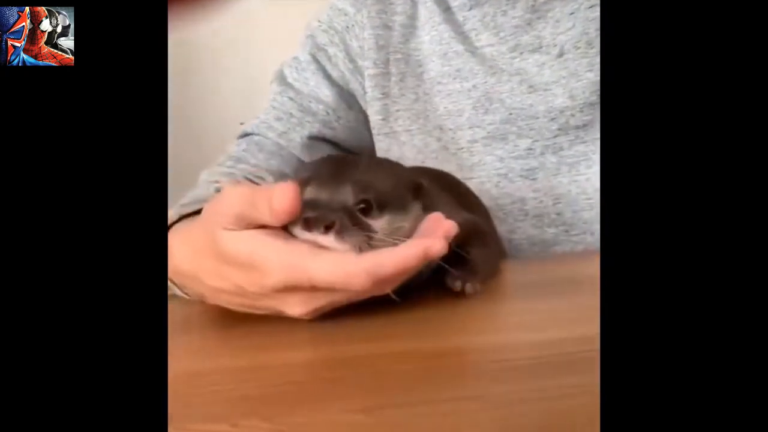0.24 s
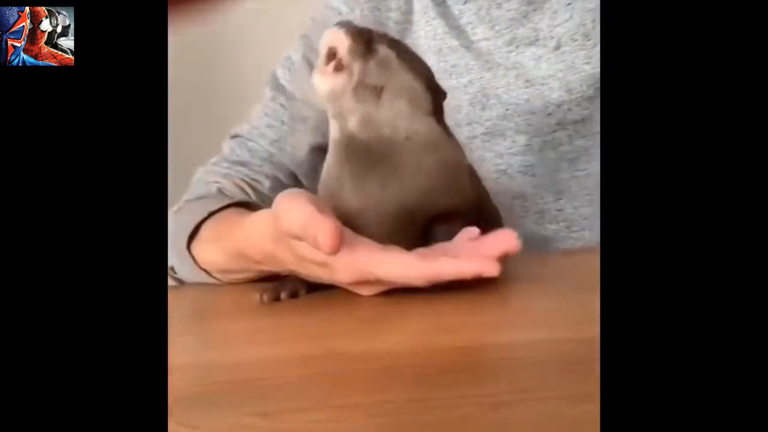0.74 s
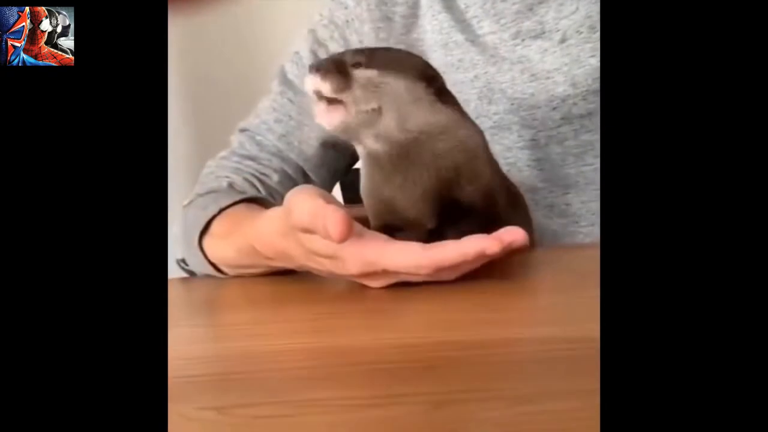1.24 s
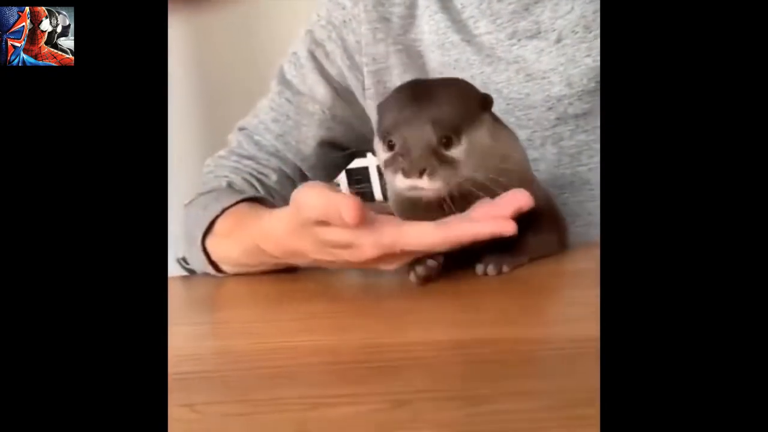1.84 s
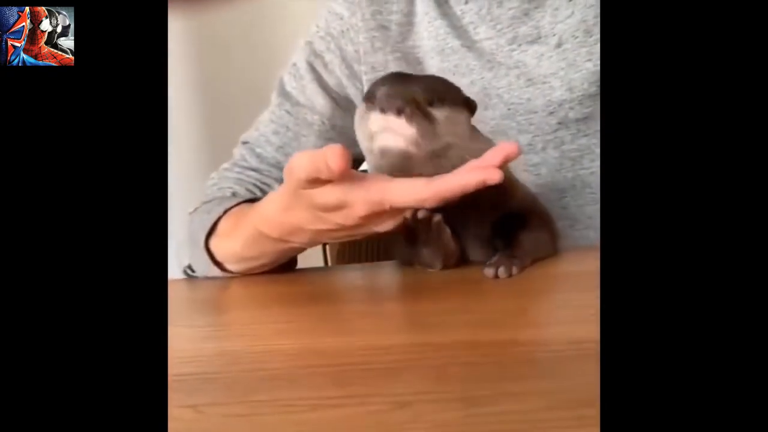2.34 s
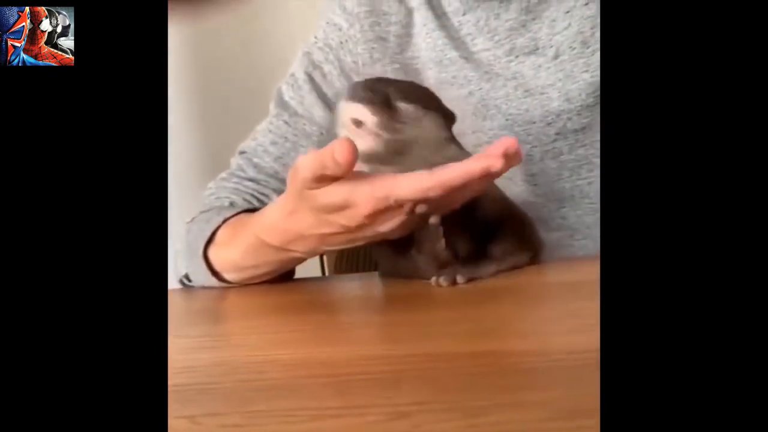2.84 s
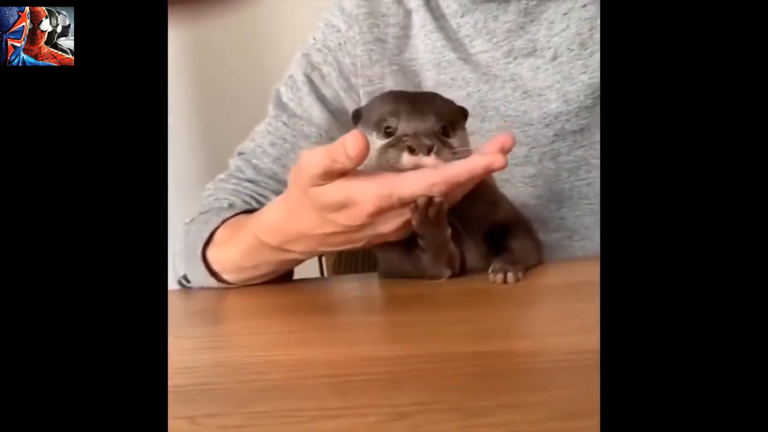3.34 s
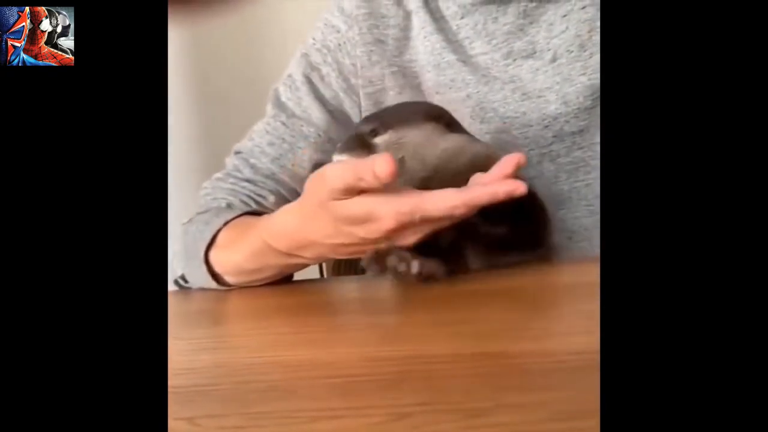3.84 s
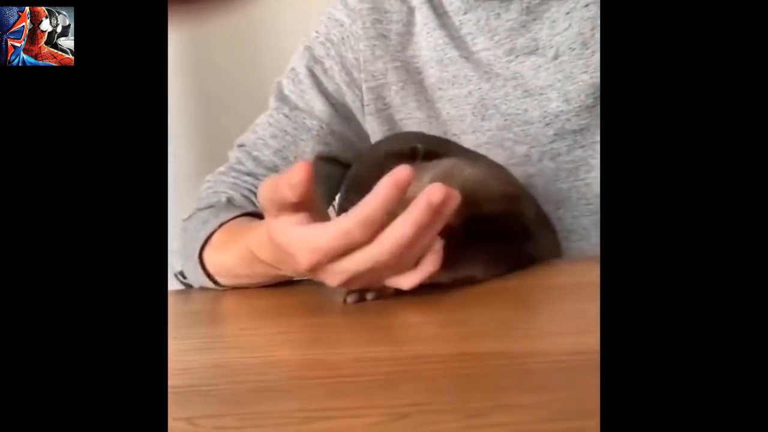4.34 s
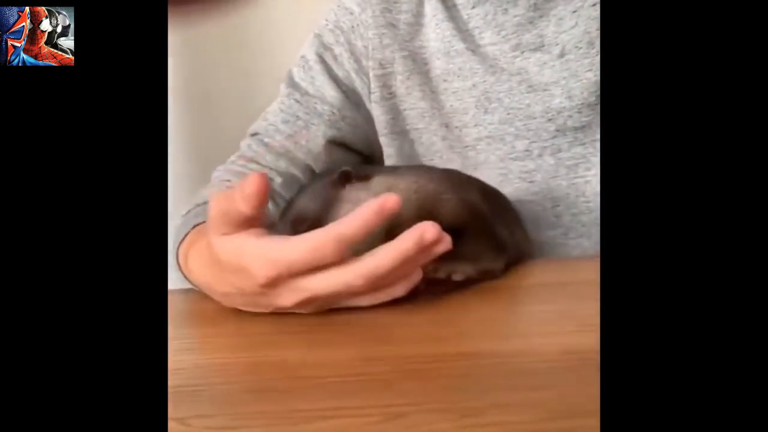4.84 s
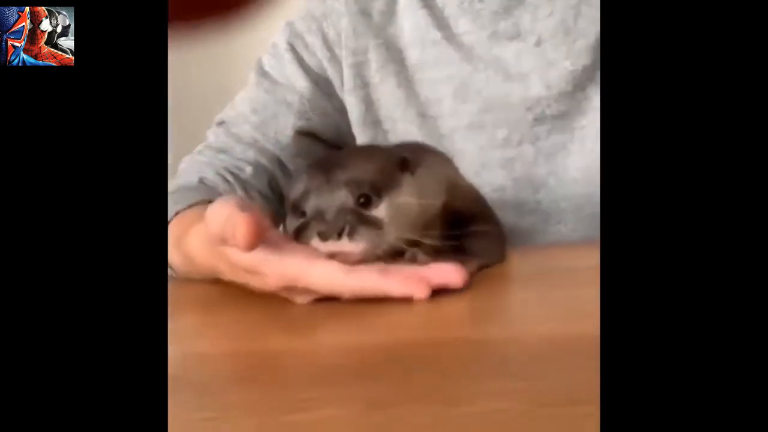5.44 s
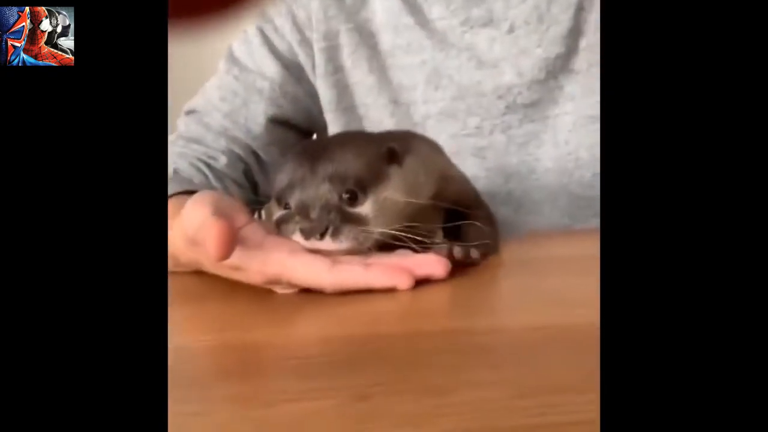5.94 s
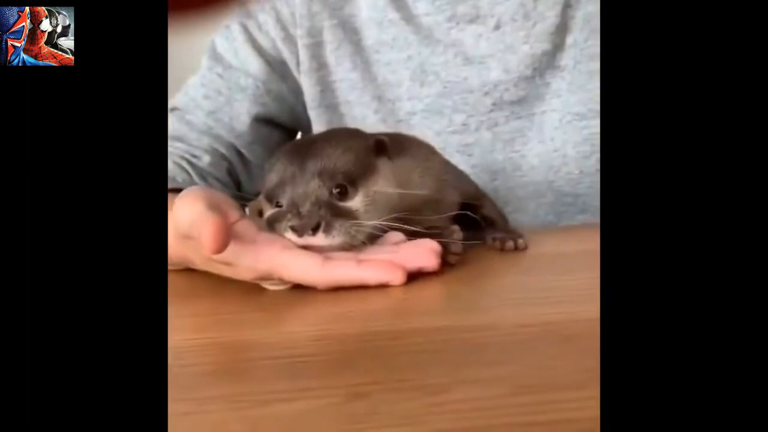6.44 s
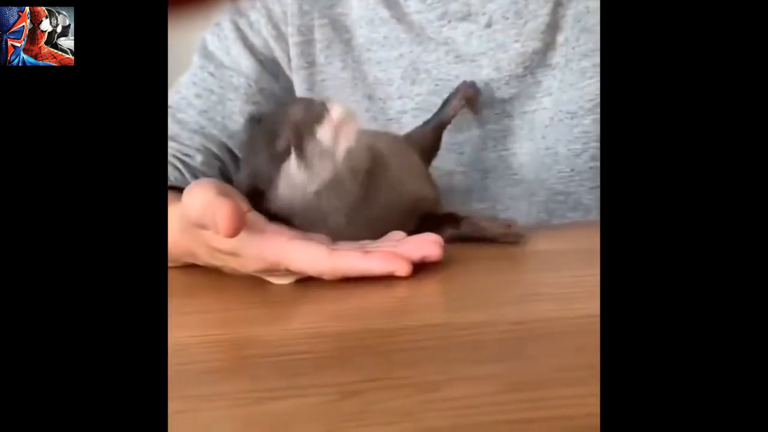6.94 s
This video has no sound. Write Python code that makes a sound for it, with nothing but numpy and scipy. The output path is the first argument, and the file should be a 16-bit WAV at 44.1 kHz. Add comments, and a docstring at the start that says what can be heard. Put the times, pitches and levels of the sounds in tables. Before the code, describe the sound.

Close to the microphone in a small quiet room, an otter opens with a loud squeal that drops steeply, then gives broken, slightly hoarse chirps and arching squeaks with gaps between. A long whimpering whine slides down and wavers. Under it wood ticks and creaks, then a low rumble as the animal rolls. Soft fur and sleeve rustles, a brief early hiss and low room tone stay behind.

```python
"""A small otter squeals and chirps close to the microphone, at a wooden table in a quiet room.
Each call is a gliding whistle-like tone with five overtones; strain makes it waver, turn hoarse and rasp.
The furniture knocks and creaks in quick slips that ring its modes, and rumbles as the otter rolls over.
Claws, fur and a sleeve make bursts of shaped noise; a soft hiss and the low room tone lie behind."""
import sys
import numpy as np
from scipy import signal
from scipy.io import wavfile

SR = 44100
rng = np.random.default_rng(int(sys.argv[2]) if len(sys.argv) > 2 else 0)


def dump(signal):
    """Clip the signal to [-1, 1] and save it as 16-bit WAV at the path in sys.argv[1]."""
    limited = np.clip(np.atleast_2d(signal).T, -1, 1)
    pcm = np.round(limited * 32767).astype(np.int16)
    wavfile.write(sys.argv[1], SR, pcm)


N = 317511
TIME = np.arange(N) / SR

# Spectrum of the room background: f/Hz, relative level/dB per Hz
ROOM_TONE = [(20, -15), (43, 0.5), (70, -3.5), (98, 0), (120, -8), (184, -5), (230, -6.5), (310, -14.5),
             (400, -19.5), (520, -27.5), (780, -22), (1050, -28.5), (1300, -29), (1600, -36), (2000, -39),
             (2700, -34.5), (3300, -49), (4600, -43), (5600, -82.5), (8500, -65.5)]
ROOM_TONE_DB = -35.5
# Soft hollow hiss in the first two seconds: t/s, level/dB
HUSH = [(0, -47.5), (.3, -42), (.7, -40.5), (1.1, -39), (1.4, -41.5), (1.65, -37.5), (1.93, -41.5),
        (2.0, -52), (2.2, -86)]
# Its spectrum: f/Hz, relative level/dB per Hz
HUSH_COLOUR = [(400, -20), (540, -9), (650, -5), (850, 2.5), (980, -19.5), (1150, -22)]

# Strokes of fur and sleeve: t at full height/s, length/s, relative level/dB
STROKES = [(0.502, 0.033, -46.5), (0.68, 0.55, -49), (1.337, 0.83, -60), (1.79, 0.23, -55.5),
           (2.192, 0.33, -59.5), (2.604, 0.15, -67.5), (2.84, 0.25, -62), (3.24, 0.16, -54),
           (3.822, 0.26, -64), (4.203, .18, -52.5), (4.537, 0.08, -57.5), (4.823, 0.12, -56),
           (5.294, 0.3, -56.5), (6.019, 0.25, -55.5), (6.892, 0.4, -60)]
# Their spectrum: f/Hz, relative level/dB per Hz
RUB_COLOUR = [(2000, 9), (4000, 8), (6200, 4.5), (8000, 6.5), (10500, -29), (11700, -1), (13000, 0.5),
              (13900, 0), (14500, -26.5)]
STROKE_ATTACK_S, STROKE_RELEASE_S = 0.12, 0.059  # linear rise, time constant of the fade
RESTING_RUB_DB = -80.5  # faint rub between strokes, on the scale of STROKES

# Rumble of the table as the otter rolls over: t/s, level/dB
ROLL = [(5.9, -62), (6.2, -41.5), (6.38, -26.5), (6.47, -27), (6.53, -22), (6.58, -24.5), (6.64, -22.5),
        (6.72, -41), (6.85, -63)]
# Its spectrum: f/Hz, relative level/dB per Hz
ROLL_COLOUR = [(22, -14), (42, 0), (65, -1.5), (110, -13.5), (220, -19.5), (400, -45.5)]
# Modes of the furniture: f/Hz, relative level/dB, t60/s, polarity/sign
WOOD = [(47.8, 3.5, 0.06, 1), (80.7, 3.5, 0.085, -1), (132.9, 4, 0.046, 1), (213, 6.5, 0.036, -1),
        (298, 7, 0.026, 1), (457, 5.5, 0.012, -1), (633, -3.5, 0.037, -1), (831, 4.5, 0.02, 1)]
# Runs of slips in a wooden joint: t/s, length/s, slips/count, slowing/-1 to 1,
# first knock level/dB, last knock level/dB, first thud level/dB, last thud level/dB (all relative)
CREAKS = [(2.029, 0.03, 2, 0, -16, -15.5, -38, -38), (5.2505, 0.058, 2, 0, -28.5, -36, -57, -43),
          (5.452, 0.072, 3, 0.047, -34, -18.5, -50, -22), (5.615, 0.004, 1, 0, -38, -38, -48, -48),
          (5.6691, 0.035, 3, -0.25, -16.5, -22.5, -24.5, -21),
          (5.718, 0.047, 4, 0.16, -18, -23, -25, -20.5), (5.7869, 0.053, 5, -0.16, -24, -21, -20, -19),
          (5.854, 0.039, 4, -0.089, -22, -25, -24, -17.5), (5.9033, 0.019, 3, -0.078, -29.5, -51, -19, -24),
          (6.059, 0.033, 3, -0.096, -30.5, -36.5, -17.5, -21),
          (6.106, .076, 7, 0.076, -35.5, -43, -18.5, -20),
          (6.215, 0.004, 1, 0.014, -40.5, -38, -16.5, -16.5),
          (6.3113, 0.051, 4, -0.24, -36, -37.5, -24, -19), (6.579, 0.021, 2, 0, -26, -63, -17.5, -18.5)]

# Light touches of claws and fur: t/s, relative level/dB
TOUCHES = [(1.783, -39), (2.408, -43.5), (2.516, -47.5), (2.855, -46), (4.253, -59.5), (4.505, -56),
           (6.331, -54), (6.942, -50.5)]
# First bounces off the table and the wall, which beat against a gliding call: delay/s, level/dB
BOUNCES = [(.004, -18.5), (.013, -15.5)]

# Throat resonances that colour the high overtones: f/Hz, relative level/dB
THROAT = [(5000, -0.5), (6250, -12), (6700, -10.5), (7200, -5), (8400, 5.5), (9050, 4.5), (10000, -36.5),
          (11000, -13.5), (12300, -9), (13400, -1.5), (14500, -21.5)]
# Throat resonances that the rasp of a strained call rings in: f/Hz, width/Hz, relative level/dB
RASP = [(4500, 1100, 5.5), (7300, 700, -9.5), (7800, 430, -2.5), (10000, 500, -11.5), (11100, 600, -7.5),
        (12200, 600, -9), (13300, 900, -5)]
RASP_DB = -4  # against the overtones, before roughness and strain scale it
# Shapes of the calls: t/s, pitch f/Hz, fundamental relative level/dB, overtones relative level/dB
SQUEAL = [(0.005, 4510, -56, -59), (0.017, 4510, -31.5, -54), (0.029, 4360, -47, -47),
          (0.039, 4415, -25.5, -44), (0.053, 4280, -39.5, -38), (0.063, 4280, -22, -34.5),
          (0.079, 4335, -33.5, -37.5), (0.125, 4133, -27, -28), (0.165, 4116, -24.5, -29),
          (0.225, 4132, -25, -28.5), (0.24, 3980, -34, -24), (0.262, 4010, -32.5, -25.5),
          (0.284, 3954, -36.5, -27), (0.302, 3890, -38.5, -25.5), (0.322, 3796, -38.5, -29.5),
          (0.339, 3966, -32.5, -24.5), (0.366, 3766, -37, -32), (0.383, 3773, -34, -32),
          (0.403, 3705, -27, -32.5), (0.425, 3600, -40.5, -38.5), (0.462, 3485, -31, -39),
          (0.481, 3440, -29.5, -45), (0.501, 3150, -33, -46), (0.514, 2100, -21, -54),
          (0.521, 1955, -35, -67), (0.529, 1244, -48, -75)]
FIRST_ARCH = [(0.942, 3640, -48, -49), (0.954, 3690, -42.5, -48), (0.982, 3660, -44, -46),
              (1.016, 4150, -39.5, -45), (1.046, 4210, -33.5, -36), (1.058, 4180, -41.5, -51),
              (1.072, 4360, -28, -56), (1.083, 4260, -28.5, -66), (1.089, 4210, -51, -44),
              (1.1, 3990, -43, -41), (1.126, 3770, -44, -41.5), (1.136, 3340, -44, -52),
              (1.148, 2850, -53, -52), (1.16, 2870, -42.5, -52), (1.172, 2740, -55, -53),
              (1.184, 2320, -31, -58), (1.201, 2277, -37.5, -71)]
CHIRPS = [
    [(2.006, 3880, -44.5, -39), (2.036, 3380, -45.5, -73), (2.06, 3995, -46, -39),
     (2.082, 4110, -31.5, -48), (2.098, 4130, -64, -63)],
    [(2.166, 3193, -38, -54.5), (2.218, 3200, -37.5, -52.5), (2.236, 4050, -39.5, -45.5),
     (2.274, 4600, -38, -41), (2.296, 3750, -39, -49)],
    [(4.848, 4440, -32, -62), (4.858, 4440, -25.5, -54), (4.872, 4710, -36.5, -55), (4.892, 4630, -37, -50),
     (4.906, 3930, -50, -48)],
]  # one such shape for each chirp
HELD_ARCH = [(2.994, 2740, -33, -50), (3.012, 2695, -35, -39), (3.028, 2742, -35.5, -43.5),
             (3.074, 2730, -32, -41.5), (3.094, 2720, -53, -57), (3.132, 2806, -51, -60),
             (3.154, 3160, -56, -60), (3.166, 3330, -33, -49), (3.176, 3440, -24.5, -45),
             (3.196, 3550, -33, -30), (3.228, 3334, -32, -46), (3.27, 3045, -32.5, -61),
             (3.286, 2950, -42, -55), (3.302, 2620, -35, -66), (3.31, 2350, -42, -59)]
YIP = [(3.347, 2196, -32, -62), (3.358, 2155, -25.5, -48), (3.368, 2112, -30, -62), (3.375, 1985, -35, -63)]
LAST_ARCH = [(3.945, 3580, -49.5, -52), (3.971, 3900, -54, -37), (4.001, 4130, -27, -47.5),
             (4.019, 4220, -43, -53), (4.036, 4060, -51, -51), (4.052, 3980, -41.5, -35),
             (4.075, 3970, -46, -45), (4.125, 3616, -39, -46), (4.145, 3570, -45, -47),
             (4.161, 3470, -38, -45.5), (4.195, 3100, -46, -54), (4.211, 2430, -57, -63),
             (4.232, 2414, -40, -68), (4.25, 2336, -48, -72), (4.272, 2395, -53, -78)]
WHINE_FALL = [(4.998, 4440, -49.5, -56.5), (5.026, 4370, -46.5, -66), (5.033, 4170, -46, -54),
              (5.07, 4010, -36, -50), (5.095, 4085, -42, -52), (5.122, 4060, -55, -49.5),
              (5.158, 4143, -38, -59), (5.166, 4130, -46, -44), (5.196, 4010, -36.5, -36),
              (5.21, 4125, -68, -39), (5.232, 4104, -35, -41), (5.306, 3840, -42.5, -34.5),
              (5.352, 3650, -37, -40.5), (5.39, 3305, -27, -39.5)]
WHINE_LOW = [(5.408, 3095, -34.5, -50), (5.475, 2780, -33.5, -50), (5.534, 2440, -31, -60),
             (5.555, 2376, -33.5, -55), (5.593, 2297, -26.5, -54), (5.614, 2217, -34.5, -48),
             (5.652, 2175, -31.5, -50.5), (5.697, 2248, -37.5, -58), (5.73, 2346, -37, -62),
             (5.755, 2650, -49, -55), (5.78, 2704, -46, -57), (5.801, 2660, -43.5, -49),
             (5.829, 2724, -44.5, -51), (5.852, 2625, -41, -46.5), (5.899, 2790, -43.5, -53),
             (5.95, 2810, -41, -50), (6, 2853, -33.5, -43.5), (6.024, 2833, -35, -47),
             (6.031, 2730, -44, -45), (6.045, 2763, -46, -47.5), (6.062, 2835, -35.5, -41.5),
             (6.098, 2777, -41.5, -45.5), (6.121, 2686, -38.5, -41), (6.162, 2635, -36.5, -41.5),
             (6.201, 2690, -42, -41.5), (6.224, 2650, -42, -42), (6.247, 2470, -33, -38.5)]
LOW_BREAK = [(6.252, 2275, -27.5, -33), (6.28, 2164, -27, -30.5), (6.3, 2104, -25, -38.5),
             (6.316, 2067, -29.5, -47), (6.325, 1830, -42, -62), (6.338, 1280, -45, -75)]
# The calls in turn: shape, roughness/0 to 1
PHRASE = [(SQUEAL, 0.01), (FIRST_ARCH, 0.29), (CHIRPS[0], 0.19), (CHIRPS[1], 0.43), (HELD_ARCH, 0.17),
          (YIP, 0.23), (LAST_ARCH, 0.37), (CHIRPS[2], 0.42), (WHINE_FALL + WHINE_LOW, 0.17),
          (LOW_BREAK, 0.057)]
# Voice turns hoarse, and brighter or duller: t at the height/s, half-length/s,
# added roughness/0 to 1, added brightness/dB per octave
STRAINS = [(0.047, 0.045, 0.03, -5), (0.3, 0.073, 0, 1), (0.432, 0.092, 0.15, 18.5),
           (1.075, 0.04, 0.2, -14), (1.185, 0.035, 0.16, -8), (2.226, 0.12, 0, 17), (3.044, 0.078, 0, -8.5),
           (3.16, 0.02, 0.44, -18), (3.254, 0.02, 0.03, 11), (3.996, 0.011, 0.18, -4),
           (4.215, 0.045, 0.21, -17), (5.234, 0.069, 0, 10), (5.58, 0.39, 0, -3), (5.872, 0.11, 0, -2),
           (6.06, 0.064, 0.55, 14), (6.15, 0.04, 0, 3), (6.227, 0.072, 0.37, 9.5)]
# Whistle overblows and splays for an instant: t/s, half-length/s, depth/0 to 1
OVERBLOWS = [(0.058, 0.007, 0.05), (1.066, 0.014, 0.2), (3.178, 0.01, 0.14), (3.99, 0.011, 0.17),
             (4.865, 0.011, 0)]
SPLAY_HZ = 406  # how far the splayed tone spreads
VOICE_TOP_HZ = 14000  # little of the voice lies above this
OVERTONE_DB_PER_OCTAVE = -17.5  # fall of the overtones, before the strains brighten or dull them
FLUTTER_DB, FLUTTER_PER_S = 0.68, 64  # loudness ripple that even a clean call has
QUAVER, QUAVER_PER_S = 0.0025, 25.0  # pitch ripple, as a share of the pitch
CUTOFF_HZ = 15700


def from_db(db):
    """Decibels to gain."""
    return 10 ** (np.asarray(db) / 20)


def rms_one(x):
    """Scale to unit power."""
    return x / np.sqrt(np.mean(x ** 2) + 1e-20)


def in_time(rows, t=TIME):
    """Columns of a curve, joined by straight lines."""
    s, *columns = np.transpose(rows)
    return [np.interp(t, s, column) for column in columns]


def at_hz(points, hz):
    """Read a spectrum on a log-frequency axis."""
    f, db = np.transpose(points)
    return np.interp(np.log(hz), np.log(f), db)


def butter(x, hz, kind, order=2):
    """Butterworth filter."""
    sos = signal.butter(order, np.clip(hz, 10, 0.45 * SR), kind, fs=SR, output="sos")
    return signal.sosfilt(sos, x + 1e-18)


def drift(rate, size=N):
    """Smooth random wander of spread about 1, made at a low sample rate and joined by lines."""
    step = max(1, int(SR / rate / 20))
    white = rng.standard_normal(size // step + 300)
    slow = rms_one(butter(white, rate * step, "low", order=4)[100:])
    return np.interp(np.arange(size) / step, np.arange(len(slow)), slow)


def noise(colour, patchy_db=0):
    """Third-octave bands of noise across a spectrum, each flickering by itself if patchy; rms 1."""
    white, out = rng.standard_normal((2, N + SR // 4)), 0
    edges = 2 ** (np.array([-1, 1]) / 6)
    for k, hz in enumerate(1000 * 2 ** (np.arange(-17, 13) / 3)):
        if hz * edges[1] > colour[0][0] and hz * edges[0] < colour[-1][0]:
            flicker_db = patchy_db * drift(14.2) if patchy_db else 0
            # neighbouring bands draw on different noise
            band = butter(white[k % 2], hz * edges, "band", order=3)[-N:]
            out = out + band * from_db(at_hz(colour, hz) + flicker_db)
    return rms_one(out)


def bumps(t, rows):
    """Sum of bell-shaped swells, from rows of (t/s, half-length/s, height)."""
    return sum(height * np.exp(-((t - s) / half) ** 2) for s, half, height in rows)


def room_tone():
    """The low rumble of the room: steady noise whose bands flicker."""
    return from_db(ROOM_TONE_DB) * noise(ROOM_TONE, patchy_db=1.97)


def hush():
    """A soft hollow hiss: noise in a narrow range that swells and stops."""
    return from_db(in_time(HUSH)[0]) * noise(HUSH_COLOUR, patchy_db=2.0)


def rustle(grain_db=1.5, stroke_db=1.65):
    """Each stroke swells, holds and dies away; within it fibres catch and release unevenly."""
    envelope = from_db(RESTING_RUB_DB)
    for s, length, db in STROKES:
        swell = np.clip(1 + (TIME - s) / STROKE_ATTACK_S, 0, 1)
        fade = np.exp(-np.clip((TIME - s - length) / STROKE_RELEASE_S, 0, 20))
        envelope = np.maximum(envelope, from_db(db) * swell * fade)
    unevenness = from_db(grain_db * drift(220) + stroke_db * drift(13))
    return envelope * unevenness * noise(RUB_COLOUR, patchy_db=4.0)


def roll():
    """The table rumbles under the rolling otter: low noise that swells and fades."""
    return from_db(in_time(ROLL)[0]) * noise(ROLL_COLOUR)


def slips():
    """Rows of (t/s, knock/dB, thud/dB); spacing and force change steadily through a run."""
    rows = []
    for s, length, count, slowing, knock, last_knock, thud, last_thud in CREAKS:
        for u in np.linspace(0, 1, int(round(count))):
            when = s + length * u * (1 + slowing * (u - 1))
            rows.append((when, knock + u * (last_knock - knock), thud + u * (last_thud - thud)))
    return rows


def ring(clicks, hz, t60):
    """A resonator: a unit click sets a dying sine of starting height 1 ringing."""
    radius, w = np.exp(-np.log(1000) / (t60 * SR)), 2 * np.pi * hz / SR
    return signal.lfilter([0, np.sin(w)], [1, -2 * radius * np.cos(w), radius ** 2], clicks + 1e-18)


def creak(knock_hz=600, thud_hz=130, contact_hz=960):
    """Each slip strikes all modes: sharp slips wake the high ones, soft slips only the low."""
    s, knock_db, thud_db = np.transpose(slips())
    out = 0
    for hz, db, t60, polarity in WOOD:
        # low modes follow the thud, high modes the knock
        high = np.clip(np.log(hz / thud_hz) / np.log(knock_hz / thud_hz), 0, 1)
        clicks = np.zeros(N)
        clicks[np.round(s * SR).astype(int)] = from_db(db + high * knock_db + (1 - high) * thud_db)
        out = out + np.sign(polarity) * ring(clicks, hz, t60)
    return butter(butter(out, 30, "high"), contact_hz, "low", order=6)


def touches(rise_s=0.0014, decay_s=0.0062, low_hz=1900, high_hz=3900):
    """Claws and fur touch lightly: brief scratchy puffs of band noise."""
    envelope, age = np.zeros(N), TIME[:SR // 10]
    puff = np.minimum(age / rise_s, 1) * np.exp(-age / decay_s)
    for s, db in TOUCHES:
        at = int(s * SR)
        envelope[at:at + len(age)] += from_db(db) * puff
    return envelope * rms_one(butter(rng.standard_normal(N), [low_hz, high_hz], "band", order=3))


def bounces(x):
    """Single early echoes: delayed, weaker copies."""
    return sum(from_db(db) * np.interp(TIME - delay, TIME, x, left=0) for delay, db in BOUNCES)


def room(x, t60, first_s):
    """Dense reflections that die away exponentially; unit power gain."""
    t = TIME[:SR // 2]
    tail = rng.standard_normal(len(t)) * np.exp(-np.log(1000) * t / t60) * (t > first_s)
    return signal.fftconvolve(x, tail / np.linalg.norm(tail))[:N]


def rasp_noise(pitch, lowest_multiple=0.9):
    """Turbulent air through the throat resonances, waking mainly those above the pitch."""
    gains = from_db([db for _, _, db in RASP])
    out = 0
    for (hz, width, _), gain in zip(RASP, gains / np.linalg.norm(gains)):
        edges = [hz - width / 2, hz + width / 2]
        band = rms_one(butter(rng.standard_normal(len(pitch)), edges, "band", order=3))
        out = out + gain / (1 + (lowest_multiple * pitch / hz) ** 10) * band
    return out


def overtone_shares(pitch, bright_db):
    """Overtones fall away with their number and swell at throat resonances; total power 0 dB."""
    slope_db = OVERTONE_DB_PER_OCTAVE + bright_db
    shares = np.array([at_hz(THROAT, k * pitch) + slope_db * np.log2(k) for k in range(2, 7)])
    return shares - 10 * np.log10(np.sum(from_db(shares) ** 2, axis=0))


def call(shape, roughness, jitter=0.015, fast_jitter=0.018, shimmer_db=4.5, air_db=-23,
         hoarse_db=-21, grain_db=2.5, puff=0.4, uneven_db=-14, edge_s=0.0026):
    """One call: strain shakes pitch and loudness, and at its height turns the voice hoarse."""
    start, end = shape[0][0], shape[-1][0]
    span = (TIME > start - edge_s) & (TIME < end + edge_s)
    t = TIME[span]

    def wander(rate):
        """Random wander over the length of this call."""
        return drift(rate, size=len(t))

    pitch, fundamental_db, overtones_db = in_time(shape, t)
    strain = bumps(t, [(s, half, more) for s, half, more, _ in STRAINS])
    bright_db = bumps(t, [(s, half, db) for s, half, _, db in STRAINS])
    rough = np.clip(roughness + strain, 0, 1)
    wobble = jitter * wander(60) + fast_jitter * wander(400)
    shaken_pitch = pitch * (1 + rough * wobble + QUAVER * wander(QUAVER_PER_S))
    phase = 2 * np.pi * np.cumsum(shaken_pitch) / SR

    # overblowing splays the fundamental into a narrow band of noise
    splayed = wander(SPLAY_HZ) * np.cos(phase) + wander(SPLAY_HZ) * np.sin(phase)
    voice = from_db(fundamental_db) * bumps(t, OVERBLOWS) * splayed

    flutter_db = FLUTTER_DB * wander(FLUTTER_PER_S)
    levels_db = [fundamental_db, *(overtones_db + overtone_shares(pitch, bright_db))]
    for k, db in enumerate(levels_db, 1):
        audible = k * pitch < SR / 2
        # air noise clings to each harmonic; hoarseness spreads into the gaps between them
        air = from_db(air_db) * rough * wander(460)
        hoarse = from_db(hoarse_db) * rough ** 3 * np.sqrt(k) * wander(870)
        gain = from_db(db + flutter_db + shimmer_db * rough * wander(55)) * audible
        voice = voice + gain * ((1 + air) * np.cos(k * phase) + hoarse * np.sin(k * phase))
        # strong and weak cycles alternate, which puts faint lines between the upper overtones
        between_db = overtones_db + uneven_db + at_hz(THROAT, (k - 0.5) * pitch)
        between = from_db(between_db) * rough * (k > 2) * audible
        voice = voice + between * wander(90) * np.cos((k - 0.5) * phase)

    # a strained throat rasps in puffs, one to each cycle
    rasp_gain = from_db(RASP_DB + overtones_db + grain_db * wander(120)) * rough * np.clip(strain, 0, 1)
    voice = voice + rasp_gain * (1 + puff * np.cos(phase)) * rasp_noise(pitch)
    edges = np.clip((np.minimum(t - start, end - t) + edge_s) / (2 * edge_s), 0, 1)
    out = np.zeros(N)
    out[span] = voice * edges
    return out


def otter():
    """All calls of the phrase in one voice, with little left above its top."""
    calls = sum(call(shape, roughness) for shape, roughness in PHRASE)
    return from_db(1.5) * butter(calls, VOICE_TOP_HZ, "low", order=12)


def scene():
    """Otter and handling close by in the room, heard nearly in mono."""
    background = room_tone() + hush() + from_db(-10.0) * rustle()
    table = from_db(-0.36) * creak() + roll()
    near = otter() + touches()
    near = near + bounces(near) + from_db(-10.5) * room(near, t60=0.19, first_s=0.0044)
    return near * from_db([[-0.2], [0.2]]) + table + background  # left a touch softer than right


def record(dry):
    """An elliptic low-pass cuts the top steeply."""
    return signal.sosfilt(signal.ellip(10, 0.1, 80, CUTOFF_HZ, fs=SR, output="sos"), dry)


dry = scene()
out = record(dry)
dump(out)
```